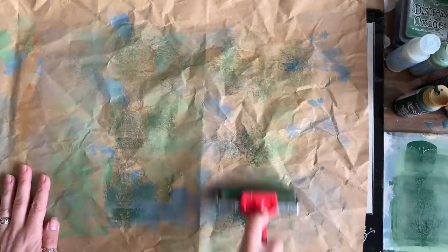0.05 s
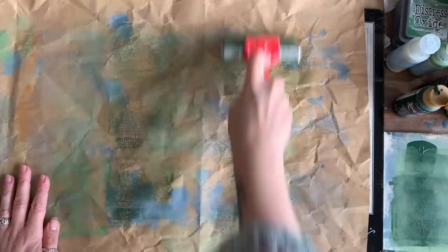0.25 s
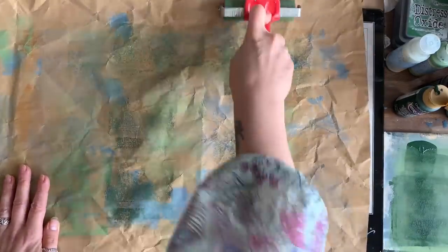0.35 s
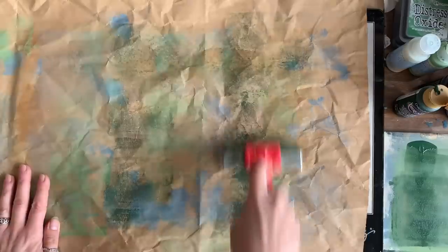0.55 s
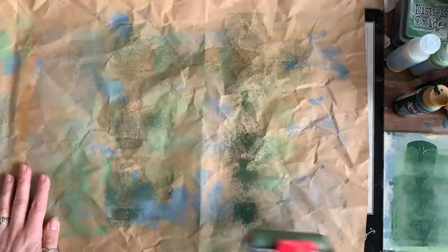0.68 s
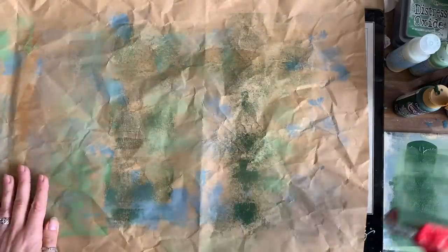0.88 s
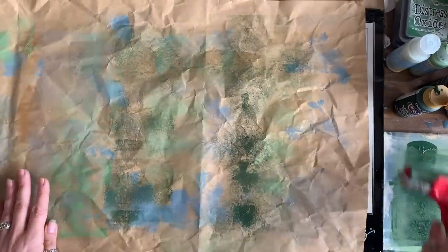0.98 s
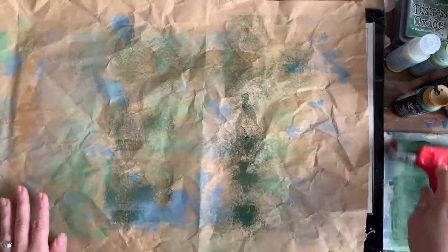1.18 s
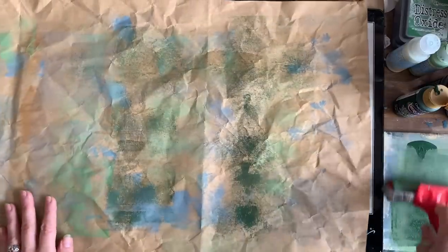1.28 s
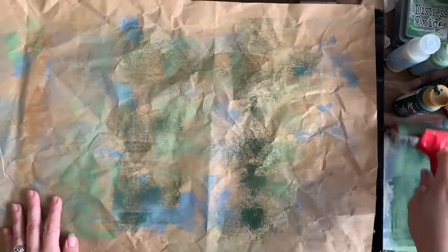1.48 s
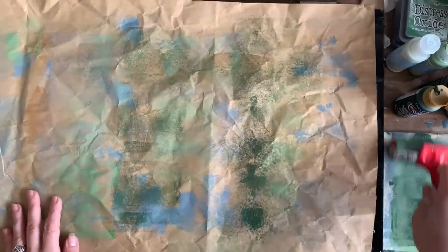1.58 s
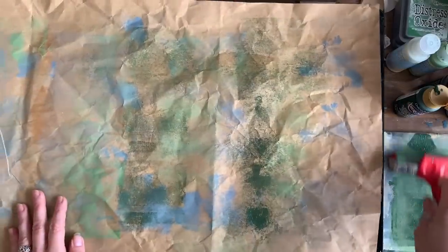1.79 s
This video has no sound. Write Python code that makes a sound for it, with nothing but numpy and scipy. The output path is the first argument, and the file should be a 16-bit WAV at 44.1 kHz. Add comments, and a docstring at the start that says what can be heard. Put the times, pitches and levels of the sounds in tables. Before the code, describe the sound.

A rubber paint roller makes two strokes over crumpled paper, drumming hollowly on the table as the creases crackle. It lands on a paint plate with a sharp tap, then hisses faintly through sticky paint, close by in a small room.

```python
"""A craft table in a small room. A rubber paint roller is pushed up and pulled back over crumpled paper.
Creases bump the roller, drum on the table and crackle; the roller lifts and the paper snaps back.
The roller lands on a paint plate with a sharp tap, then rolls to and fro in tacky paint,
which hisses and ticks as its threads tear."""
import sys
import numpy as np
from scipy import signal
from scipy.fft import rfft, irfft
from scipy.io import wavfile
from scipy.ndimage import uniform_filter1d

SR = 44100
rng = np.random.default_rng(int(sys.argv[2]) if len(sys.argv) > 2 else 0)


def generate_wav(sig):
    """Save sig (samples, or channels by samples) to the path in sys.argv[1] as 16-bit PCM at SR."""
    pcm = np.round(np.clip(np.atleast_2d(sig).T, -1, 1) * 32767).astype(np.int16)
    wavfile.write(sys.argv[1], SR, pcm)


N = 81585
TIME = np.arange(N) / SR
BUMPS_PER_S, BUMP_SPREAD_DB = 1800, 2
# deep rumble under the roller: (frequency [Hz], gain [dB])
TABLE_RUMBLE = [(20, -42), (32, -24), (44, -8.5), (60, 3), (80, -8.5), (100, -9.5), (135, -13.5),
                (200, -16.5), (500, -67.5), (16000, -100)]


def amp(db):
    """dB to gain."""
    return 10 ** (np.asarray(db) / 20)


def unit_rms(x):
    """Scale to rms 1."""
    return x / np.sqrt(np.mean(x ** 2) + 1e-20)


def steady(x, samples=2200):
    """Hold the running rms near 1."""
    power = uniform_filter1d(uniform_filter1d(x ** 2, samples), samples // 2)
    return x / np.sqrt(power + 1e-9)


def at_hz(points, hz):
    """Interpolate on a log-frequency axis."""
    points_hz, values = np.transpose(points)
    return np.interp(np.log(hz + 1), np.log(points_hz), values)


def envelope(rows, column):
    """Gain over time from one dB column."""
    rows = np.array(rows)
    return amp(np.interp(TIME, rows[:, 0], rows[:, column]))


def add(mix, start_s, sound):
    """Mix a sound in at start_s."""
    part = mix[max(round(start_s * SR), 0):][:len(sound)]
    part += sound[:len(part)]


def colour(x, spectrum, hump_hz=4000, hump_db=0, treble_db=0):
    """Minimum-phase filter of unit energy: spectrum, optional hump, treble shelf."""
    hz = np.fft.rfftfreq(8192, 1 / SR)
    octaves = np.log2((hz + 1) / hump_hz)
    db = at_hz(spectrum, hz) + hump_db * np.exp(-.5 * (octaves / .25) ** 2)
    db += at_hz([(5000, 0.038), (12000, treble_db)], hz)
    cepstrum = irfft(np.log(amp(db)))
    cepstrum[1:len(hz) - 1] *= 2
    taps = irfft(np.exp(rfft(cepstrum[:len(hz)], len(cepstrum))))
    return signal.fftconvolve(x, taps / np.linalg.norm(taps))[:len(x)]


def grains(per_s, spread_db):
    """Random tiny clicks of uneven size, rms 1."""
    size = amp(spread_db * np.minimum(rng.exponential(1, N), 4))
    return unit_rms(size * rng.choice([-1, 1], N) * (rng.random(N) < per_s / SR))


def burst(decay_s, rise_s=0.0004):
    """A quick, dying run of slips with an even spectrum."""
    t = TIME[:6000]
    fade = np.exp(-t / decay_s)
    phase = np.angle(rfft(rng.standard_normal(len(t)) * fade))
    slips = irfft(np.exp(1j * phase)) * np.sqrt(fade) * np.minimum(t / rise_s, 1)
    return slips * np.linalg.norm(fade) / np.linalg.norm(slips)


def ring(modes):
    """Decaying sines of a struck object."""
    t = TIME[:SR // 2]
    return sum(amp(db - 60 * t / t60_s) * np.sin(2 * np.pi * hz * t) for hz, db, t60_s in modes)


def bumped_mode(hz, width_hz):
    """One mode kept ringing evenly by bumps, which the rubber softens."""
    t = TIME[:SR // 3]
    soft_onset = 1 - np.exp(-t * hz)
    mode = soft_onset * np.exp(-np.pi * width_hz * t) * np.sin(2 * np.pi * hz * t)
    bumps = grains(BUMPS_PER_S, BUMP_SPREAD_DB)
    return steady(signal.fftconvolve(bumps, mode)[:N], samples=3000)


def room_tone():
    """Quiet, low, steady noise."""
    # (frequency [Hz], gain [dB])
    spectrum = [(20, -12.5), (75, 0), (170, -12), (500, -22), (2500, -21), (5000, -34), (16000, -37)]
    return amp(-73.5) * colour(rng.standard_normal(N), spectrum)


def room_reflections(x):
    """Early reflections off the table top and a short tail."""
    # room decay: (frequency [Hz], t60 [s])
    t60_s = [(100, .33), (700, 0.7), (2000, 0.25), (5000, 0.21), (15000, 0.22)]
    t = TIME[:SR // 2]
    hz, frame_s, bands = signal.stft(rng.standard_normal(len(t)), SR, nperseg=256)
    bands *= amp(-60 * frame_s / at_hz(t60_s, hz)[:, None])
    tail = signal.istft(bands, SR, nperseg=256)[1][:len(t)] * np.minimum(t / 0.023, 1)
    early = rng.standard_normal(len(t)) * (rng.random(len(t)) < .1)
    early *= np.exp(-t / 0.012) * (t > .002)
    response = amp(-12.5) * tail / np.linalg.norm(tail) + amp(-9) * early / np.linalg.norm(early)
    return signal.fftconvolve(x, response)[:N]


def rustles():
    """Faint rustles while the roller is carried to the plate."""
    # (time [s], level [dB], decay [s])
    events = [(1.047, -66, 0.019), (1.065, -61, 0.014), (1.096, -65.5, 0.0085), (1.114, -62, 0.028)]
    # (frequency [Hz], gain [dB])
    spectrum = [(100, -14), (800, -12.5), (1300, -1), (1900, -7), (2500, 2), (3500, -12.5), (6000, -26.5),
                (16000, -41)]
    out = np.zeros(N)
    for start_s, db, decay_s in events:
        add(out, start_s, amp(db) * colour(burst(decay_s), spectrum))
    return out


def roller_in_paint():
    """Paint threads tear off the turning roller, brighter when it is fast; the plate hums and rumbles."""
    # (time [s], tack [dB], fizz [dB], plate hum [dB], deep rumble [dB])
    strokes = [(1.25, -69, -58, -47, -70), (1.312, -58.5, -70, -79, -69), (1.398, -62, -67.5, -73, -71),
               (1.45, -64, -75.5, -48.5, -62), (1.462, -60.5, -73, -52, -71), (1.524, -69, -88, -73, -68),
               (1.622, -66.5, -74, -60, -61), (1.672, -66, -71.5, -80, -60.5),
               (1.706, -70.5, -81, -69, -80), (1.74, -69, -75, -78, -77), (1.766, -65.5, -71.5, -65.5, -71),
               (1.79, -64.5, -72, -73, -82), (1.85, -65, -73.5, -59, -65)]
    # tacky hiss: (frequency [Hz], gain [dB])
    tack_spectrum = [(60, -16), (220, 2), (350, -0.5), (480, 3), (750, -3), (1350, 2.5), (1800, 0.5),
                     (2400, -3), (4200, -9.5), (5400, -7.5), (7000, -30), (16000, -32)]
    # its treble: (frequency [Hz], gain [dB])
    fizz_spectrum = [(100, -49), (2500, -4), (5500, 2.5), (7500, -4.5), (8800, 0.5), (11000, -2.5),
                     (14500, 0.5), (16000, -9)]
    # plate: (frequency [Hz], gain [dB])
    hum_spectrum = [(20, -51), (60, -23), (80, -22), (100, 17), (140, -2.5), (180, -7), (500, -35),
                    (16000, -100)]
    start_s, rise_s, threads_per_s, spread_db = 1.21, 0.053, 5700, 2.5
    tack = amp(2) * colour(grains(threads_per_s, spread_db), tack_spectrum) * envelope(strokes, 1)
    fizz = amp(0.5) * colour(grains(threads_per_s, spread_db), fizz_spectrum) * envelope(strokes, 2)
    hum = amp(-3) * steady(colour(rng.standard_normal(N), hum_spectrum)) * envelope(strokes, 3)
    rumble = amp(-2.5) * steady(colour(rng.standard_normal(N), TABLE_RUMBLE)) * envelope(strokes, 4)
    return np.clip((TIME - start_s) / rise_s, 0, 1) * (tack + fizz + hum + rumble)


def paint_ticks():
    """Larger paint threads snap."""
    # (time [s], level [dB], hump centre [Hz], decay [s])
    ticks = [(1.354, -54.5, 3530, 0.0035), (1.4636, -50.5, 3000, 0.0011), (1.614, -51, 3000, 0.0015)]
    # (frequency [Hz], gain [dB])
    spectrum = [(100, -5), (1200, 5), (4500, 5), (7000, -13.5), (16000, -1)]
    out = np.zeros(N)
    for start_s, db, hump_hz, decay_s in ticks:
        add(out, start_s, amp(db) * colour(burst(decay_s), spectrum, hump_hz, hump_db=8))
    return out


def plate_taps():
    """Roller hits plate: hard click, short ring, table thump, hollow knock."""
    # (time [s], click [dB], thump [dB], knock [dB], hump centre [Hz], hump [dB], treble [dB])
    taps = [(1.1551, -49, -86, -81, 2600, 23, -15), (1.1658, -20, -33.5, -68, 4020, 6, 0),
            (1.1746, -39, -44.5, -47, 5000, -6, 7), (1.2561, -43, -53, -44.5, 1590, 20, 0)]
    # (frequency [Hz], gain [dB])
    click_spectrum = [(100, -16), (500, -22), (950, -14.5), (1350, -4.5), (2300, -7), (3100, -4.5),
                      (3700, 2.5), (4600, -3), (5400, -0.5), (6100, 3), (7300, -7.5), (13500, -15),
                      (15200, -5), (16500, -3.5)]
    # plate and roller frame: (frequency [Hz], gain [dB], t60 [s])
    plate_modes = [(1280, -4, 0.051), (1500, -7, 0.061), (1640, -5.5, 0.12), (2594, -4.5, 0.072),
                   (3350, -8, 0.082), (3550, -4, 0.069), (3910, -4, 0.042), (4040, 0, 0.056),
                   (3980, -3, 0.076), (4150, -1, 0.063), (4620, -17, .1), (4580, -18, 0.1),
                   (5380, -1, 0.082), (5380, 4, 0.089), (6080, 2, 0.058), (6270, -3, 0.062)]
    # table beneath: (frequency [Hz], gain [dB], t60 [s])
    table_modes = [(56, -8.5, 0.19), (108.7, -2.5, 0.17), (123.5, -7, 0.25), (162, -13.5, 0.21),
                   (216, -19, 0.27), (287, -6, .13)]
    # roller body: (frequency [Hz], gain [dB], t60 [s])
    roller_modes = [(445, -11, .06), (480, -4, 0.087), (554, -13, 0.05)]
    plate, knock = amp(-23) * ring(plate_modes), ring(roller_modes)
    thump = ring(table_modes) * np.minimum(TIME[:SR // 2] / 0.014, 1)
    out = np.zeros(N)
    for start_s, click_db, thump_db, knock_db, hump_hz, hump_db, treble_db in taps:
        click = colour(burst(decay_s=0.0017), click_spectrum, hump_hz, hump_db, treble_db)
        add(out, start_s, amp(click_db) * click)
        add(out, start_s, amp(click_db) * plate + amp(thump_db) * thump + amp(knock_db) * knock)
    return out


def paper_snaps():
    """Single creases buckle, each with its own colour."""
    # (time [s], relative level [dB], hump centre [Hz], hump [dB], treble [dB], decay [s])
    snaps = [(.0855, -31.5, 4900, 13, -4.5, .003), (0.111, -41, 5400, 1, 8, .002),
             (.144, -36, 5600, 13, 10, .002), (0.2327, -35, 3700, 6, -8, 0.0059),
             (.293, -35, 9100, 9, 2, 0.0014), (0.3174, -30.5, 3980, 4, -2, 0.0029),
             (0.325, -37, 7900, 19, 14, 0.00083), (0.4373, -39, 3920, 8, -4, .005),
             (0.452, -44, 3500, 7, -5, .003), (0.5944, -33, 5050, 4, 0, 0.0037),
             (.617, -37, 3900, 8, -4, 0.0017), (.622, -32, 3000, 11, 3.5, 0.0034),
             (.639, -38, 4600, 11, 1, 0.0026), (0.6455, -39, 3340, 5, 2, 0.0045),
             (.675, -30, 3620, 12, 0.5, 0.0048), (0.6786, -33, 3460, 10, -5, 0.0038),
             (0.7, -26.5, 5940, 12.5, 15, 0.001), (.702, -38.5, 3340, 4, -8, 0.0027),
             (0.7304, -46.5, 3560, 11, -18, 0.0051), (.755, -42, 3540, 7.5, -11, 0.0091),
             (0.763, -41, 3530, 11, -11, 0.005), (.765, -43, 3040, -4, -7, .003),
             (0.8006, -33.5, 4720, 12, -2.5, 0.0043), (0.8066, -34.5, 4630, 10.5, -2.5, 0.0027),
             (0.858, -44, 3400, 13, -6, 0.0019), (0.8826, -48.5, 6000, 1, -2, 0.0037),
             (0.9006, -50, 1974, 0, -1.5, 0.0029), (0.9079, -40, 2700, 10.5, -6, 0.0012)]
    # (frequency [Hz], gain [dB])
    spectrum = [(60, -17.5), (400, -8), (850, -11), (1300, -1.5), (2300, -3.5), (4000, -4.5), (6500, -5.5),
                (8000, -10.5), (13000, -17.5), (15500, -11)]
    out = np.zeros(N)
    for start_s, db, hump_hz, hump_db, treble_db, decay_s in snaps:
        add(out, start_s, amp(db) * colour(burst(decay_s), spectrum, hump_hz, hump_db, treble_db))
    return amp(-1.5) * out


def paper_crackle():
    """Tiny creases flatten under the roller; each kind grows with effort at its own rate."""
    # crackle strength: (time [s], level [dB])
    strength = [(0, -58), (.06, -57), (.095, -47.5), (.13, -44.5), (.2, -45), (.26, -47), (.32, -48.5),
                (.36, -61.5), (.41, -57.5), (.46, -47.5), (.52, -43), (.58, -45), (.63, -45.5), (.665, -69),
                (.73, -70), (.8, -54)]
    # (hump centre [Hz], gain [dB], treble [dB], effort exponent)
    creases = [(2600, -6.5, 9, .9), (3330, -9, -3.5, 3.3), (5170, -5.5, -10.5, 0.35), (8700, -14.5, 4, 2.1)]
    # (frequency [Hz], gain [dB])
    spectrum = [(100, -28), (1000, -9.5), (2300, 2.5), (3500, 0), (5200, -1), (8000, -5), (12000, -9.5),
                (16000, -22)]
    pops_per_s, reference_db = 9000, -47.5
    effort = envelope(strength, 1) / amp(reference_db)
    out = np.zeros(N)
    for hump_hz, db, treble_db, exponent in creases:
        pops = grains(pops_per_s / len(creases), spread_db=3.5)
        out += amp(db) * effort ** exponent * colour(pops, spectrum, hump_hz, 5, treble_db)
    return amp(-50) * out


def drumming():
    """Creases ring roller and table; the hollow tone deepens as the roller travels away."""
    # (frequency [Hz], width [Hz], gain [dB])
    modes = [(155.3, 6.3, -11), (215, 14, -13), (359.5, 8.9, -0.5), (401.4, 41, 2), (458.4, 45, 8.5),
             (534.6, 37.4, 4), (588, 40, -2)]
    # strongest ring: (time [s], centre [Hz])
    centre_path = [(0, 550), (.1, 580), (.17, 466), (.24, 407), (.31, 356), (.42, 372), (.48, 480),
                   (.54, 520), (.6, 538), (.68, 486)]
    boost_db, boost_octaves = 12, .27
    centre_hz = np.interp(TIME, *np.transpose(centre_path))
    out = np.zeros(N)
    for hz, width_hz, db in modes:
        nearness = np.exp(-.5 * (np.log2(hz / centre_hz) / boost_octaves) ** 2)
        out += amp(db + boost_db * nearness) * bumped_mode(hz, width_hz)
    return amp(-3) * steady(out, samples=1000)


def sheet_scuff():
    """The sheet rings and scuffs on the table."""
    # (frequency [Hz], width [Hz], gain [dB])
    modes = [(703, 13, 6), (737, 6.3, -1.5), (798, 54, 3), (840, 5.5, -0.5), (963, 26, -9), (1051, 72, 0.5),
             (1195, 9.7, -16), (1327, 24, 4), (1862, 18, -3.5), (1843, 18, -8.5)]
    # (frequency [Hz], gain [dB])
    scuff_spectrum = [(30, -42), (130, -1.5), (280, 0.5), (480, -4), (650, -3.5), (850, 2.5), (1150, -5.5),
                      (1550, -13), (2100, -10.5), (3200, -23), (6000, -36), (16000, -67.5)]
    ringing = unit_rms(sum(amp(db) * bumped_mode(hz, width_hz) for hz, width_hz, db in modes))
    scuff = steady(colour(grains(per_s=4600, spread_db=3), scuff_spectrum))
    return amp(-4.5) * ringing + amp(-2) * scuff


def roller_on_paper():
    """Creases bump the roller: drumming, scuffing, table rumble and crackle fade as it lifts."""
    # (time [s], drumming [dB], scuffing [dB], table rumble [dB])
    strokes = [(0, -40.5, -43, -38), (.03, -52.5, -52.5, -60), (.075, -51, -54.5, -50),
               (.1, -37.5, -47, -53), (.155, -39, -44, -40.5), (.195, -33, -38.5, -47),
               (.235, -34, -45, -43), (.26, -29.5, -47.5, -37.5), (.295, -41, -48.5, -43.5),
               (.33, -50, -54.5, -46), (.39, -66, -66, -57), (.43, -52, -55.5, -52.5),
               (.48, -31.5, -41, -45.5), (.535, -23, -35, -35.5), (.58, -29, -37, -38.5),
               (.615, -29, -38.5, -40), (.645, -44.5, -54, -44), (.675, -59, -67, -47.5),
               (.73, -78, -65, -59), (.8, -84, -89, -97)]
    bumps = grains(BUMPS_PER_S, BUMP_SPREAD_DB)
    drum = drumming() * envelope(strokes, 1)
    sheet = sheet_scuff() * envelope(strokes, 2)
    rumble = steady(colour(bumps, TABLE_RUMBLE), samples=1400) * envelope(strokes, 3)
    contact = amp(np.interp(TIME, [.66, .8, .95], [0, -8, -40]))
    return contact * (drum + sheet + rumble + paper_crackle())


def scene():
    """Mono mix; only the short sounds feed the reflections."""
    hits = paper_snaps() + rustles() + plate_taps() + paint_ticks()
    return (room_tone() + roller_on_paper() + roller_in_paint() + hits + room_reflections(hits))[None]


def record(dry):
    """Microphone low cut and band limit."""
    low_hz, high_hz = 40, 15850
    low_cut = signal.butter(8, low_hz, "high", fs=SR, output="sos")
    band_limit = signal.firwin(255, high_hz, window=("kaiser", 9), fs=SR)
    return signal.oaconvolve(signal.sosfilt(low_cut, dry), band_limit[None], "same")


dry = scene()
out = record(dry)
generate_wav(out)
```